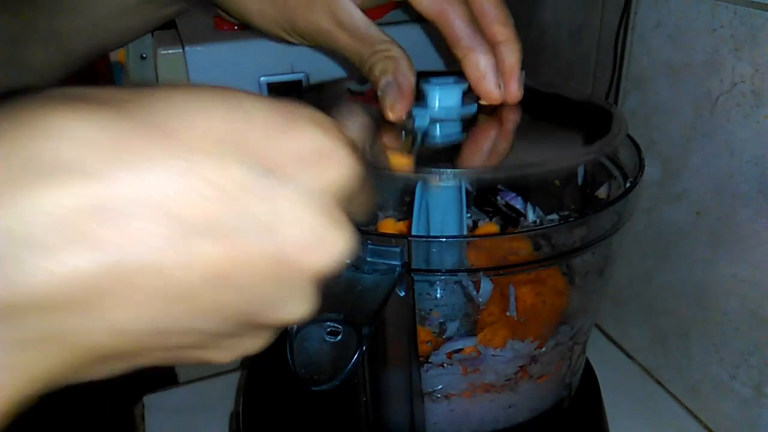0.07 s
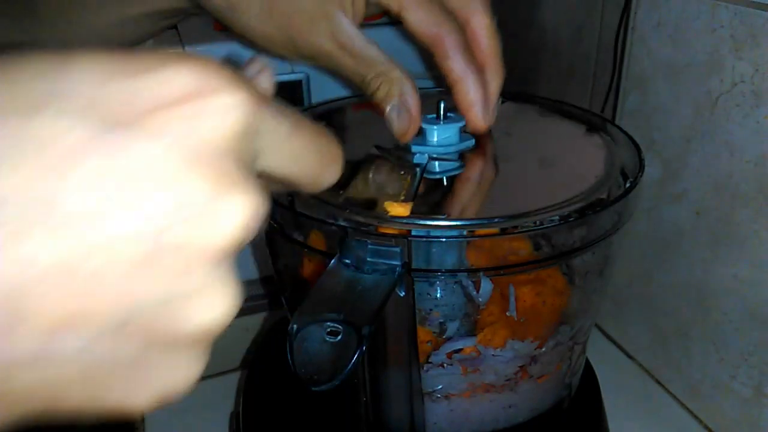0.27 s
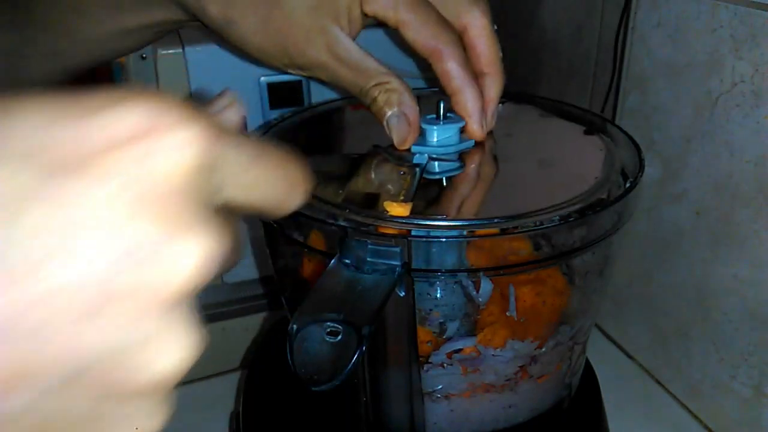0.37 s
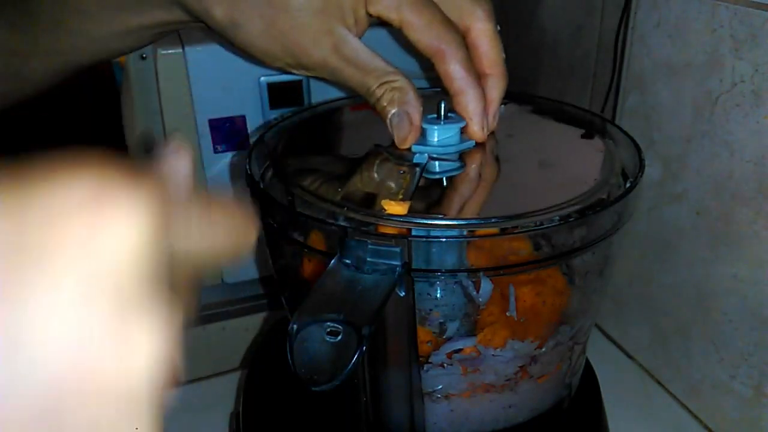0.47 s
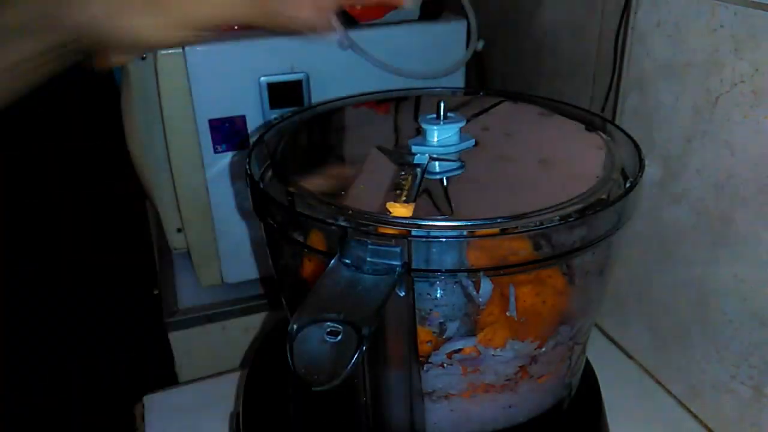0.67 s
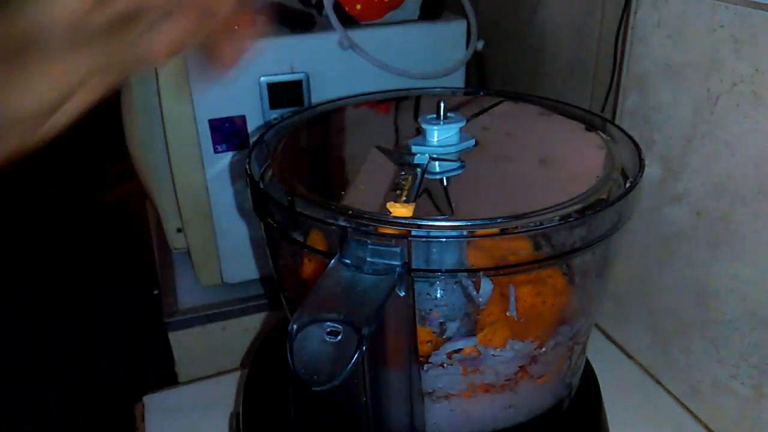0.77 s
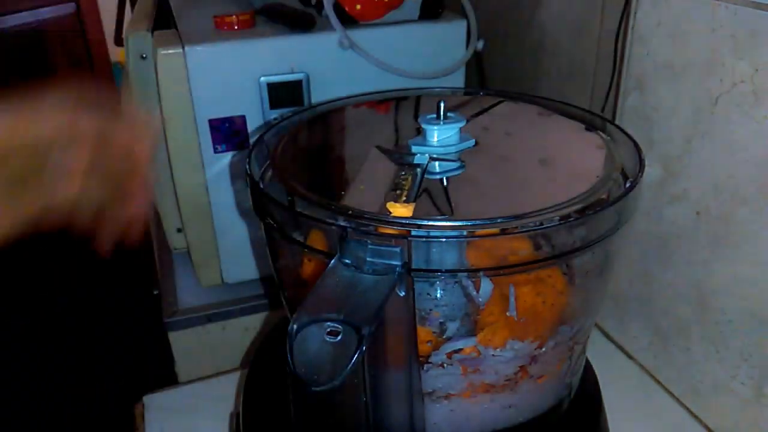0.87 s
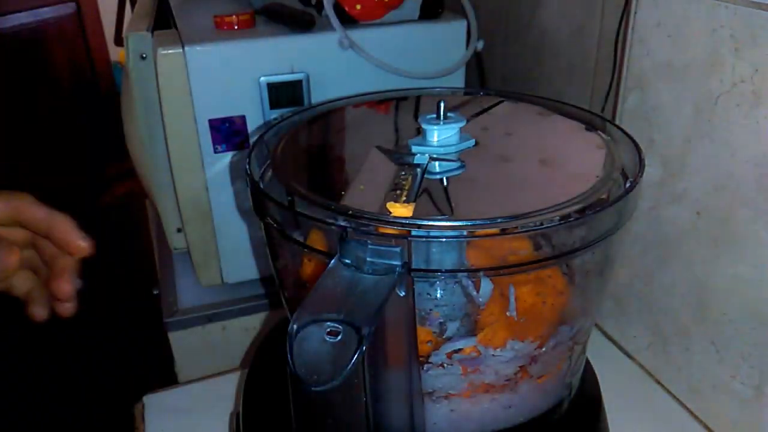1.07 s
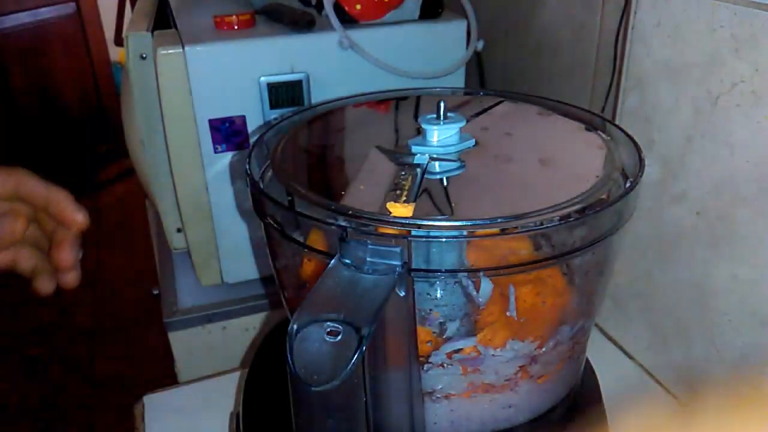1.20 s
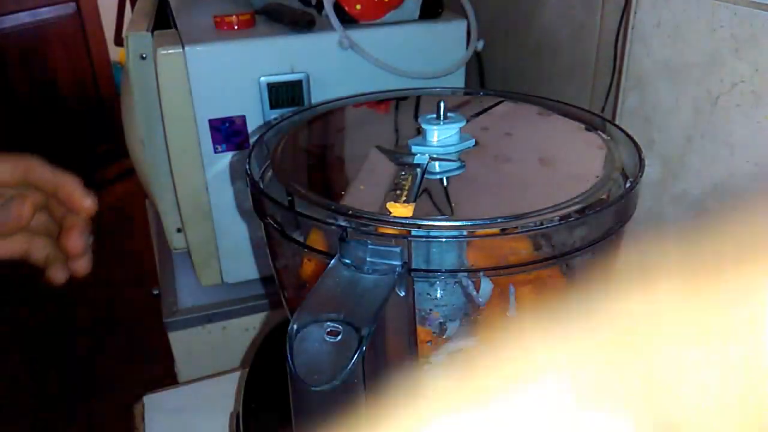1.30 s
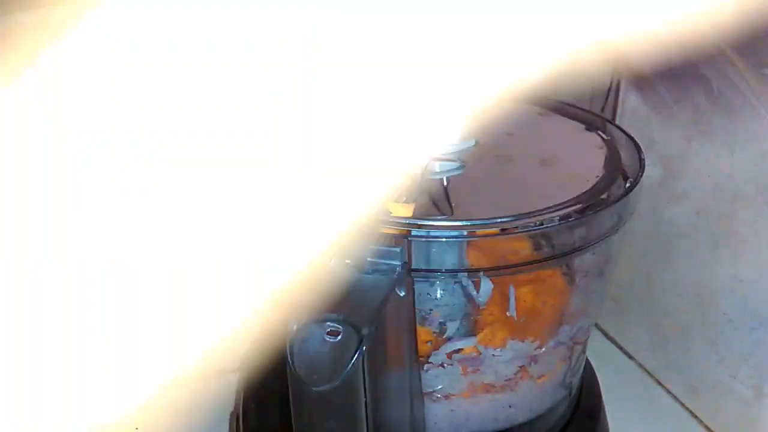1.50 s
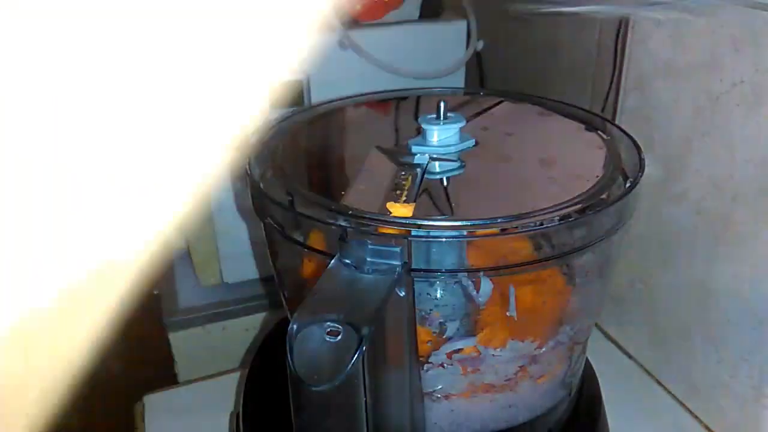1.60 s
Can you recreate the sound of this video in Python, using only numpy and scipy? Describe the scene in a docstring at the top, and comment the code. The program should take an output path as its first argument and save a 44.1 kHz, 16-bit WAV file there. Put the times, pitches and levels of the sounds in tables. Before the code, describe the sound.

A food processor's slicing disc drops onto its plastic bowl with a sharp double clack and brief hollow ring; a second later the lid rattles in a quick clatter, close in a small tiled kitchen, motor off.

```python
"""Food processor disc and lid in a kitchen

A slicing disc drops onto the spindle, bounces and settles in the hollow plastic bowl; a second later the
hard lid is dragged and picked up with a clatter. Blows are damped noise bursts plus ringing modes; sliding
is random grains; light handling ticks are clusters of damped modes. A noise tail makes the small tiled
kitchen; filtered noise and sines make its air and faint mains hum. A close stereo microphone hears it all.
"""
import sys
import numpy as np
from scipy import signal
from scipy.fft import rfft, irfft, next_fast_len
from scipy.io import wavfile

SR = 44100
rng = np.random.default_rng(int(sys.argv[2]) if len(sys.argv) > 2 else 0)


def inscribe(sig):
    """Save sig as 16-bit PCM at rate SR to the path in sys.argv[1].

    A 1-D sig is mono; a 2-D sig holds one channel per row.
    Samples are clipped to [-1, 1] before scaling.
    """
    pcm = np.round(np.clip(np.atleast_2d(sig).T, -1, 1) * 32767)
    wavfile.write(sys.argv[1], SR, pcm.astype(np.int16))


N = 72765
T_S = np.arange(N) / SR

# room air spectrum: freq_hz, level_db
AIR_COLOUR = [(20, 0.5), (40, -10.5), (65, -8.5), (95, -9), (210, -14), (300, -20), (600, -23),
              (1100, -30.5), (3200, -39.5), (7800, -36.5), (10000, -38.5), (15000, -43)]
# mains hum partials: freq_hz, mid_db, side_db
HUM_PARTIALS = [(57.2, -52.5, -54.5), (120, -72, -75.5), (191.8, -71.5, -64.5), (300, -74, -85.5)]
# plastic sliding on plastic: start_s, length_s, level_db
SLIDES = [(0.113, 0.14, -50), (0.934, 0.216, -53.5)]
# friction spectrum: freq_hz, gain_db
SLIDE_COLOUR = [(100, -29.5), (600, 1.5), (1500, -3.5), (3200, -2.5), (5000, -4), (7700, 1), (9000, -5),
                (15000, -10)]
# handled plastic: start_s, level_db, pitch_hz, second_pitch_hz, second_db (re first), snap_db (re level)
TICKS = [(0.181, -51.5, 845, 1610, -4, -8), (0.652, -42, 1627, 1350, -7.5, 2.5),
         (1.0622, -43, 1648, 760, -7.5, -8), (1.434, -44, 1963, 2930, -3, -16),
         (1.5539, -46.5, 1975, 2990, -6, -10.5)]
# tick snap spectrum: freq_hz, gain_db
SNAP_COLOUR = [(100, 0), (350, -2.5), (560, 17), (950, -3.5), (3000, 0.5), (6000, 3), (15000, 1)]
# disc on bowl, last a nudge as the hand lets go:
# start_s, clack_db, ring_db, body_db (re clack), clack_t60_s, crack_db (re clack)
DISC_HITS = [(.2003, -15.5, -30.5, 2.5, 0.084, 12.5), (.2628, -13.5, -27.5, -2, 0.053, 0),
             (.2966, -24.5, -43, 3, 0.1, -5), (.323, -33.5, -39.5, 15.5, 0.031, -10),
             (.338, -33.5, -39, 12, .06, -8), (.652, -58.5, -64, 15, 0.092, -10)]
# lid knocks and rattles: start_s, clack_db, ring_db, body_db (re clack), clack_t60_s, crack_db (re clack)
LID_HITS = [(1.1055, -34.5, -58, 12, 0.05, -10), (1.1556, -15.5, -45, -6, 0.06, -18),
            (1.15765, -10.5, -46.5, -4.5, 0.034, 2), (1.1705, -29, -49, -2.5, .018, 15),
            (1.178, -26, -46, -1.5, .025, 16), (1.1907, -20, -38.5, 3, 0.072, 1.5),
            (1.2075, -22, -54, -3, 0.071, -7), (1.2255, -15.5, -42, 1, 0.045, -17),
            (1.2295, -14, -36, -7.5, 0.047, -7.5), (1.24, -17, -48.5, -4, 0.1, -5),
            (1.2545, -18, -38, -22, 0.06, 0), (1.273, -29.5, -40.5, -0.5, 0.069, -2),
            (1.289, -27, -49.5, -6, 0.053, 2)]
# dense, quickly damped modes of disc and bowl: freq_hz, gain_db
DISC_COLOUR = [(60, -13), (130, 2.5), (240, 2), (380, -0.5), (560, 14), (830, 17.5), (1080, 1.5),
               (1550, 4.5), (1850, -0.5), (2300, 2), (3200, 3), (4200, 2), (4700, -5), (5500, 0), (7800, 2),
               (8900, -9), (15000, -14)]
# dense, quickly damped modes of the lid: freq_hz, gain_db
LID_COLOUR = [(60, -14.5), (150, -6), (330, -4), (550, 4.5), (900, -1.5), (1550, -7.5), (1950, 1.5),
              (2700, -3), (4100, -3.5), (5200, -2.5), (6600, -2.5), (7600, 0), (8500, -8.5), (15000, -14.5)]
# long modes of disc and bowl: freq_hz, mid_db, side_db, t60_s
DISC_MODES = [(494.5, -7, 7, 0.27), (527.5, -10, 1, 0.36), (551.7, -9, -14.5, 0.49), (581, -8, 0.5, 0.4),
              (633, -16, -5, 0.66), (650.2, -6.5, 3, 0.27), (805, -15, -15, 0.37), (843, 1, -10, 0.35),
              (930, -22.5, -25, 0.061), (1157, -8, -33.5, 0.14), (1312, -16.5, -6.5, .35),
              (2245.6, -10.5, -5.5, 0.29), (2813, -13.5, -12.5, 0.16), (4005, -11, -19.5, 0.18)]
# long modes of the lid: freq_hz, mid_db, side_db, t60_s
LID_MODES = [(480, -10, -2.5, 0.14), (510.5, -11, -7, 0.11), (690, -22.5, -14, 0.075), (767.3, -8, -3, 0.3),
             (1138, -7, -10, 0.2), (1328.6, -0.5, 5.5, 0.13), (1454, -9, -12, 0.21), (1797, -1, 0, 0.14),
             (1968, 2, 5.5, 0.093), (2023, 4.5, 4.5, 0.084), (2425, -7, -1.5, 0.11),
             (2967, -2, -1.5, 0.064), (5600, -43, -9, 0.29), (7870, -17, 0, .16)]
# kitchen reverberation spectrum: freq_hz, gain_db
ROOM_COLOUR = [(100, 0.5), (300, -3.5), (600, -11.5), (1200, -3.5), (2500, -10), (5000, -10.5), (7500, -13),
               (10000, -8.5), (15000, -17.5)]
# stereo width of diffuse sound: freq_hz, side_re_mid_db
WIDTH = [(50, -0.5), (110, 6.5), (200, 8), (650, 7.5), (1300, -1), (2400, -2), (8000, -1.5), (15000, 1)]
# microphone channels, left the duller: freq_hz, gain_db
LEFT_COLOUR = [(60, -1.5), (200, 0), (700, 2.5), (1300, 0), (3000, .5), (7500, -3), (10000, -7),
               (14500, -15)]
RIGHT_COLOUR = [(60, -1), (200, 1), (700, 4), (1300, 1.5), (3000, 1.5), (7500, 1.5), (10000, 0.5),
                (14500, 2.5)]

AIR_DB = -53.5  # RMS, mid and side powers summed
SLIDE_GRAINS_PER_S = 5000
TICK_T60_S, TICK_RISE_S, TICK_SIDE_DB = 0.04, 0.00062, 1  # rise is a time constant
TICK_CLUSTER = 0.077  # nominal relative spacing of the three modes in a cluster
CRACK_TAU_S, BODY_HZ = 0.00015, 1310  # crack decay time constant; body/crack crossover
SAME_SHARE = 0.69  # power share of the clack alike in all blows on a part
RING_SPREAD_DB, RING_ROOM_DB = 1.5, -6.5  # random spread per mode; send to room, re clacks
EARLY_T60_S, LATE_T60_S, LATE_DB = 0.25, 0.6, -3
ROOM_DELAY_S = 0.0055  # silence before the tail, then as long again to fade in
CUTOFF_HZ = 16100


def from_db(db):
    """Decibels to amplitude ratio."""
    return 10 ** (np.asarray(db) / 20)


def colour(x, points):
    """Causal minimum-phase filter through (freq_hz, gain_db) points, by folding the cepstrum."""
    size = next_fast_len(N + SR // 4, True) // 2 * 2
    hz, db = np.transpose(points)
    grid_hz = np.maximum(np.arange(size // 2 + 1) * SR / size, 1)
    grid_db = np.interp(np.log(grid_hz), np.log(hz), db)
    cepstrum = irfft(np.log(from_db(grid_db)))
    cepstrum[1:size // 2] *= 2
    cepstrum[size // 2 + 1:] = 0
    response = np.exp(rfft(cepstrum))
    return irfft(rfft(x, size) * response)[..., :N]


def widen(x):
    """Power-preserving mid/side balance of diffuse sound: mostly side in the low mids."""
    hz, db = np.transpose(WIDTH)
    mid_db = -10 * np.log10(1 + from_db(db) ** 2)
    mid = colour(x[0], np.c_[hz, mid_db])
    side = colour(x[1], np.c_[hz, mid_db + db])
    return np.array([mid, side])


def decay(t_s, t60_s):
    """Exponential decay, 60 dB down at t60_s."""
    return np.exp(-np.log(1000) * t_s / t60_s)


def add(out, start_s, x):
    """Mixes x into out from start_s."""
    i = int(start_s * SR)
    out[..., i:i + x.shape[-1]] += x[..., :N - i]


def fine_modes():
    """Random mid/side pattern of modes too dense to tell apart: 0.2 s of white noise."""
    return rng.standard_normal((2, SR // 5))


def burst(noise, t60_s):
    """Mid and side of one contact: countless modes dying together."""
    return noise * decay(T_S[:noise.shape[1]], t60_s)


def background():
    """Steady room air as coloured noise, mains hum as sines with the side a quarter cycle ahead."""
    air = widen(colour(rng.standard_normal((2, N)), AIR_COLOUR))
    out = from_db(AIR_DB) * air / np.sqrt(2 * np.mean(air ** 2))
    quarter = np.array([[0], [np.pi / 2]])
    for hz, mid_db, side_db in HUM_PARTIALS:
        phase = 2 * np.pi * (hz * T_S + rng.random())
        out += from_db([[mid_db], [side_db]]) * np.sin(phase + quarter)
    return out


def slides():
    """Fine friction grains that swell as a part is pushed along, over a faint bed of grains."""
    out, share = np.zeros((2, N)), SLIDE_GRAINS_PER_S / SR
    grains = rng.standard_normal((2, N)) * (rng.random(N) < share) / np.sqrt(share)
    for start_s, length_s, db in SLIDES:
        end_s = start_s + length_s
        times_s = [start_s, start_s + 0.68 * length_s, end_s, end_s + .01]
        # end values hold before and after the slide
        swell = np.interp(T_S, times_s, [0.07, 1, 0.92, 0.016])
        out += from_db(db) * grains * swell
    return widen(colour(out, SLIDE_COLOUR))


def ticks():
    """Light touches: two clusters of close, damped modes and a little broadband snap."""
    knocks, snaps = np.zeros((2, N)), np.zeros((2, N))
    t_s = T_S[:SR // 5]
    envelope = decay(t_s, TICK_T60_S) * (1 - np.exp(-t_s / TICK_RISE_S))

    def cluster(hz):
        """Three close modes at random phase."""
        spread = 1 + TICK_CLUSTER * np.arange(-1, 2) * rng.uniform(.5, 1.7, size=3)
        cycles = hz * spread[:, None] * t_s + rng.random((3, 1))
        return np.exp(2j * np.pi * cycles).sum(axis=0) / np.sqrt(3)

    for start_s, db, hz, second_hz, second_db, snap_db in TICKS:
        modes = cluster(hz) + from_db(second_db) * cluster(second_hz)
        ring = from_db(db) * envelope * modes
        add(knocks, start_s, np.array([ring.imag, from_db(TICK_SIDE_DB) * ring.real]))
        add(snaps, start_s, from_db(db + snap_db) * burst(fine_modes(), TICK_T60_S))
    return knocks + widen(colour(snaps, SNAP_COLOUR))


def clacks(hits, clack_colour):
    """Every blow gives a bright crack and a short clack; blows on one part share much of their fine pattern."""
    out, pattern = np.zeros((2, N)), fine_modes()
    body_filter = signal.butter(1, BODY_HZ, fs=SR)
    crack_filter = signal.butter(2, BODY_HZ, "high", fs=SR)
    for start_s, db, _, body_db, t60_s, crack_db in hits:
        noise = np.sqrt(SAME_SHARE) * pattern + np.sqrt(1 - SAME_SHARE) * fine_modes()
        clack = burst(noise, t60_s)
        body = signal.lfilter(*body_filter, clack)
        contact = fine_modes() * np.exp(-T_S[:clack.shape[1]] / CRACK_TAU_S)
        crack = signal.lfilter(*crack_filter, contact)
        blow = clack - body + from_db(body_db) * body + from_db(crack_db) * crack
        add(out, start_s, from_db(db) * blow)
    return widen(colour(out, clack_colour))


def rings(hits, modes):
    """Every blow excites the part's long modes, complex one-pole resonators; side a quarter cycle ahead of mid."""
    out = np.zeros((2, N))
    start_s, _, ring_db = np.transpose(hits)[:3]
    spread_db = RING_SPREAD_DB * rng.standard_normal((len(hits), len(modes)))
    strengths = from_db(ring_db[:, None] + spread_db)
    for k, (hz, mid_db, side_db, t60_s) in enumerate(modes):
        blows = np.zeros(N)
        blows[(start_s * SR).astype(int)] = strengths[:, k]
        pole = decay(1 / SR, t60_s) * np.exp(2j * np.pi * hz / SR)
        ring = signal.lfilter([1], [1, -pole], blows + 1e-18)  # offset avoids denormals
        sign = (-1) ** k
        out += sign * np.array([from_db(mid_db) * ring.imag, from_db(side_db) * ring.real])
    return out


def kitchen(x):
    """Dense early reflections off counter and tiles, then a weaker, longer tail, as decaying noise."""
    tail = decay(T_S, EARLY_T60_S) + from_db(LATE_DB) * decay(T_S, LATE_T60_S)
    tail *= np.clip(T_S / ROOM_DELAY_S - 1, 0, 1)
    response = rng.standard_normal((2, N)) * tail / np.sqrt(np.sum(tail ** 2))
    wet = signal.fftconvolve(x, response, axes=1)[:, :N]
    return colour(wet, ROOM_COLOUR)


def scene():
    """Disc, lid and small noises in the kitchen, turned from mid/side to left/right."""
    contacts = slides() + ticks() + clacks(DISC_HITS, DISC_COLOUR) + clacks(LID_HITS, LID_COLOUR)
    ringing = rings(DISC_HITS, DISC_MODES) + rings(LID_HITS, LID_MODES)
    room = kitchen(contacts + from_db(RING_ROOM_DB) * ringing)
    mid, side = background() + contacts + ringing + room
    return np.array([mid + side, mid - side])


def record(dry):
    """Microphone: each channel has its own colour; a steep low-pass cuts the top."""
    x = np.array([colour(dry[0], LEFT_COLOUR), colour(dry[1], RIGHT_COLOUR)])
    low_pass = signal.cheby2(16, 60, CUTOFF_HZ, fs=SR, output="sos")
    return signal.sosfilt(low_pass, x)


dry = scene()
out = record(dry)
inscribe(out)
```